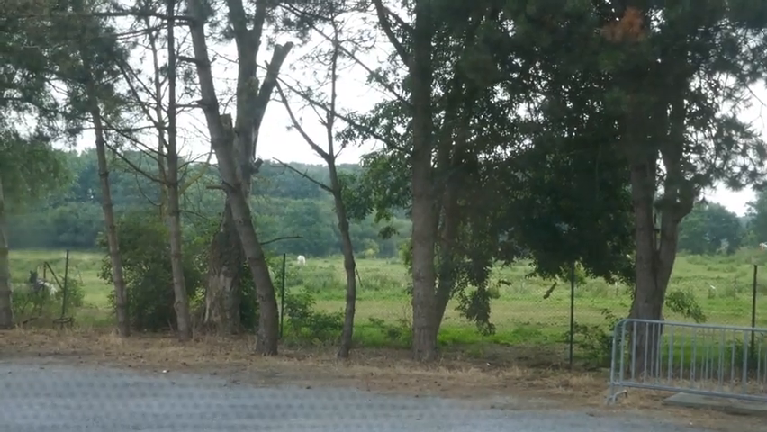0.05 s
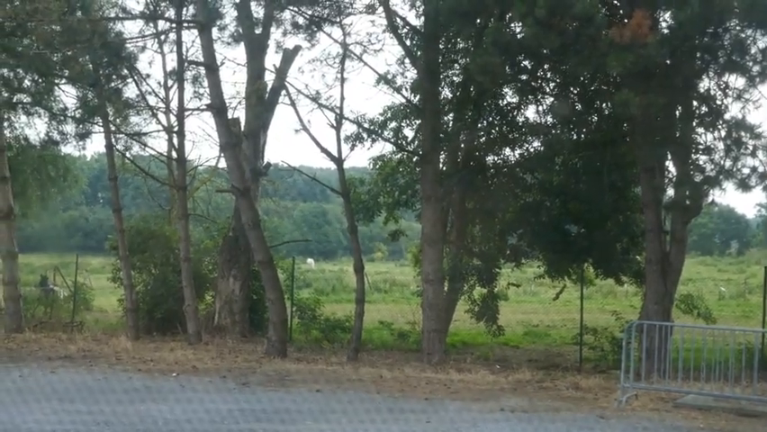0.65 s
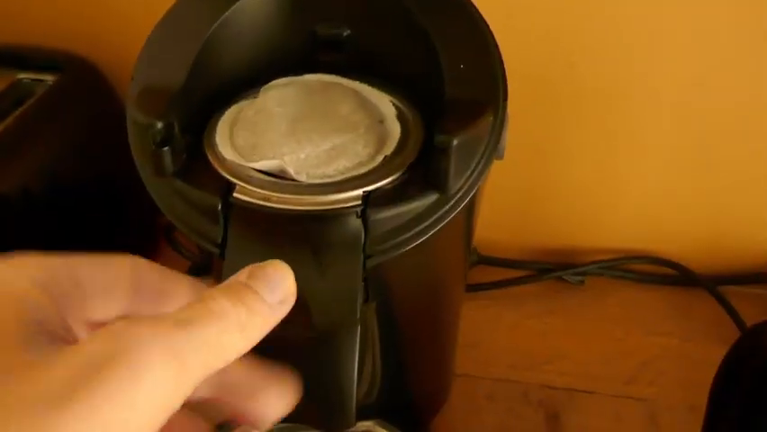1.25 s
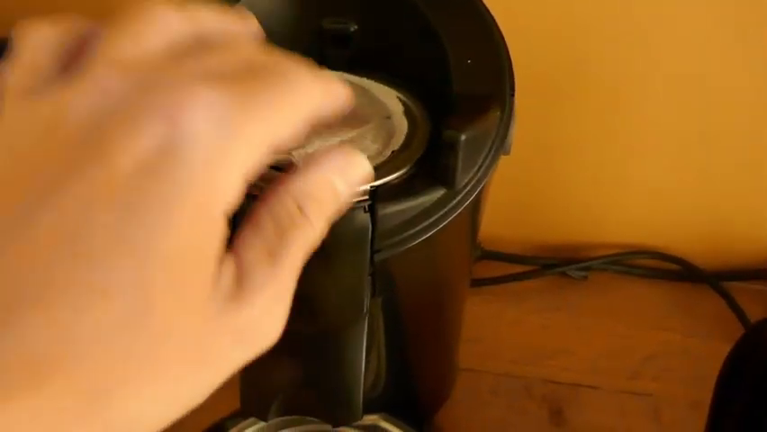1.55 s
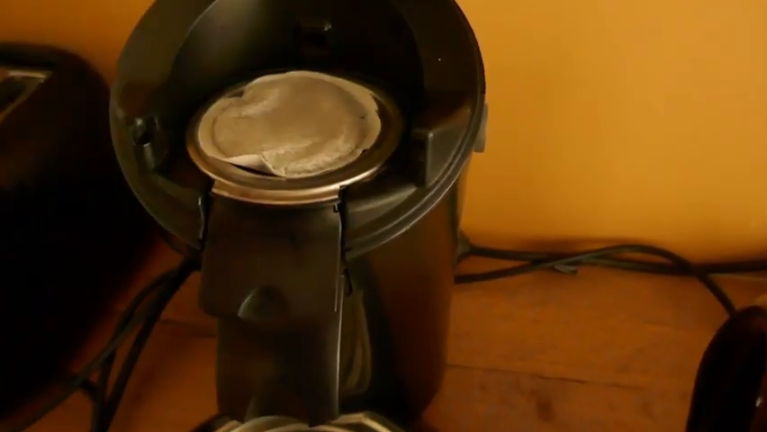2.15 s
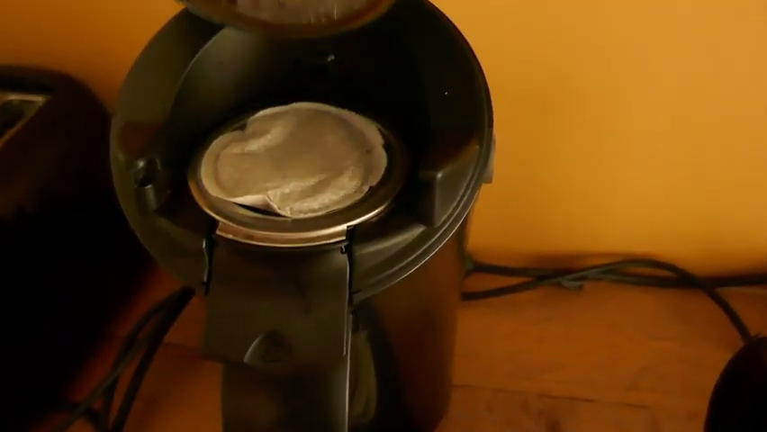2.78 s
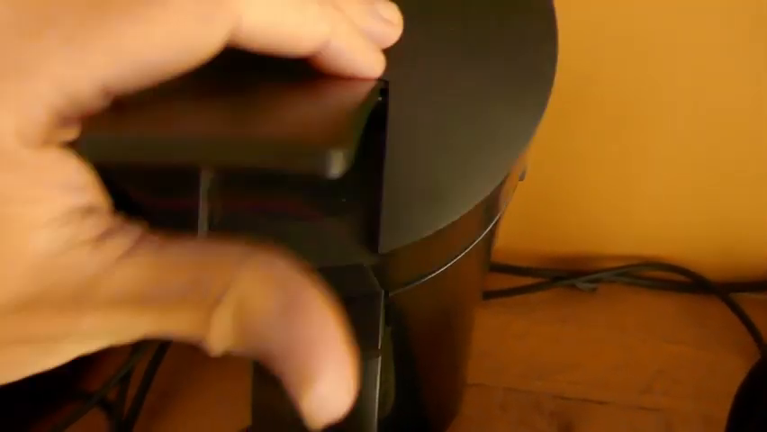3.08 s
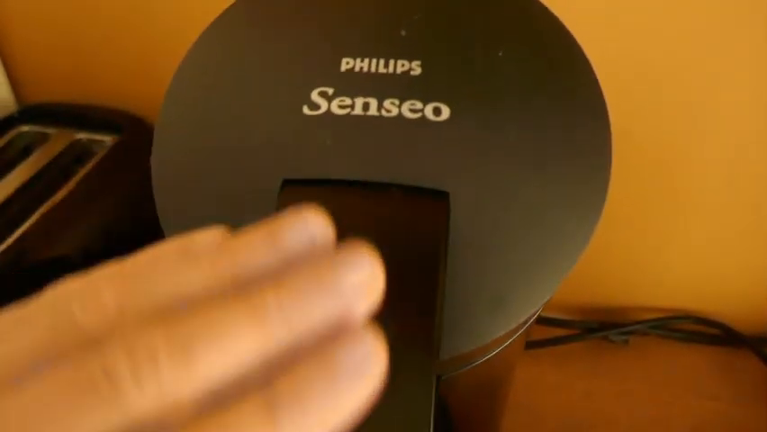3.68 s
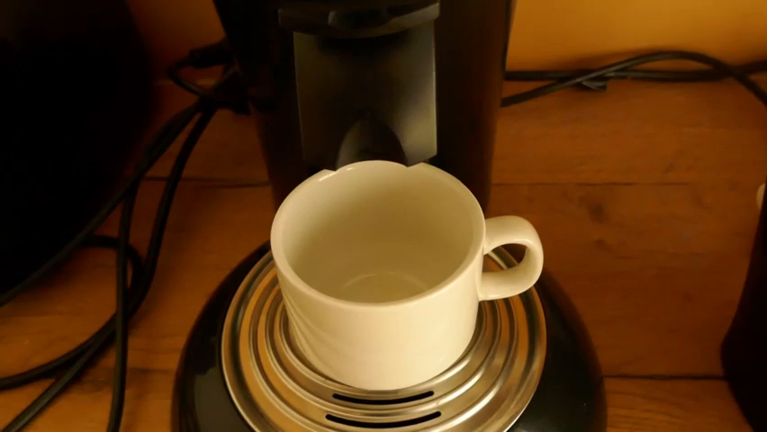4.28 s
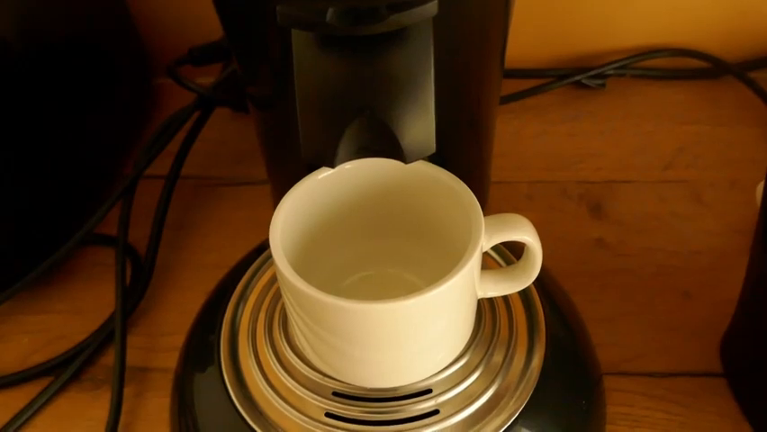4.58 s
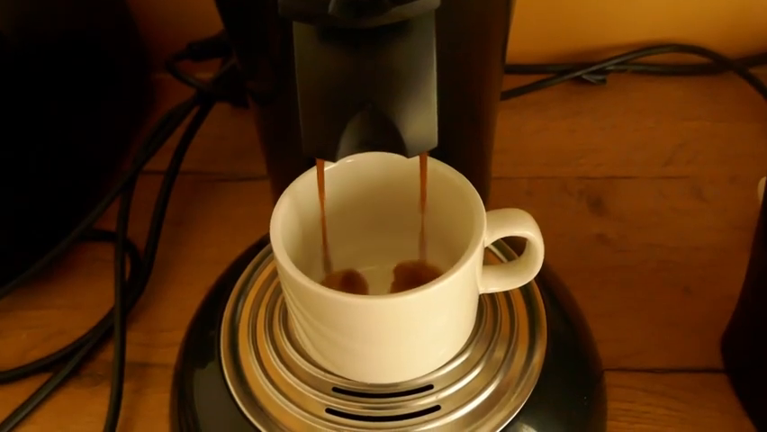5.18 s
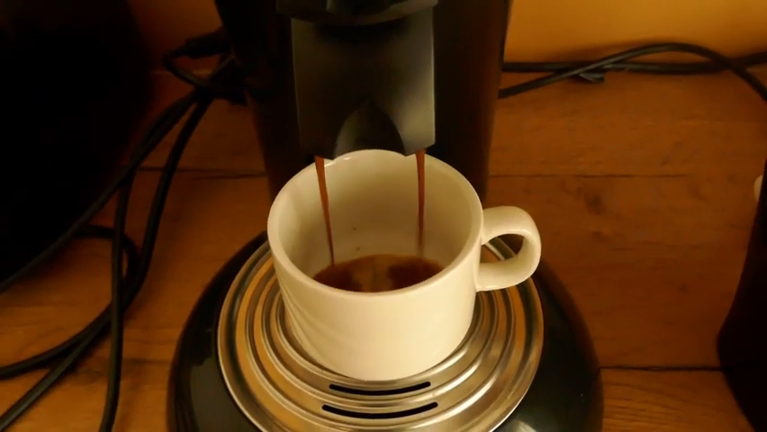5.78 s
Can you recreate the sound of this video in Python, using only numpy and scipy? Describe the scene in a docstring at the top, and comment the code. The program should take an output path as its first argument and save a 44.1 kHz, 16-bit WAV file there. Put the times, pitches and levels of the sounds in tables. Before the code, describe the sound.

Plastic parts knock, a coffee machine's lid thumps and snaps shut, then its pump buzzes and coffee trickles into a cup.

```python
"""Faint open air gives way to a small kitchen, where a hand seats the pod holder in a plastic coffee
machine: knocks ring the housing and the room, and the holder squeaks twice. The lid rubs and thumps shut,
then the lever snaps down, so loud that a limiter ducks. The vibration pump starts, buzzing, rattling and
hissing at the mains rate, its tone shifting as the pod soaks. Air crackles in the line and spits at the
spout, and at last thin streams of coffee trap small bubbles in the cup."""
import sys
import numpy as np
from scipy import signal
from scipy.fft import rfft, irfft, next_fast_len
from scipy.io import wavfile
from scipy.ndimage import uniform_filter1d, minimum_filter1d, map_coordinates

SR = 44100
rng = np.random.default_rng(int(sys.argv[2]) if len(sys.argv) > 2 else 0)


def to_wav(s):
    """Save 16-bit WAV."""
    ch = np.atleast_2d(s).T  # columns
    pcm = np.round(np.clip(ch, -1, 1) * 32767)  # PCM
    wavfile.write(sys.argv[1], SR, pcm.astype(np.int16))


N = 266364

RING_DB, RING_Q, RING_MASKING = 10, 3, 0.36  # the struck part's note; masking: dB lost per dB of hardness
REBOUND_S, REBOUND_DB, REBOUND_HARDNESS_DB = .018, -15.5, -5  # a loose part settles, weaker and softer
REBOUND_CAP_DB = -19.5  # stronger blows than this bounce no further
# The hits of holder, lid and lever. Each row: start in seconds, relative level in dB, ring pitch in Hz,
# seconds for the chatter to fall 60 dB, hardness in dB, thud in dB.
PLASTIC_HITS = [(0.8217, -17, 856, 0.023, 7, -25), (0.848, -27.5, 673, 0.081, -23, -6),
                (0.908, -27, 1030, .044, -0.5, 8), (1.038, -38, 787, 0.038, -15, 4),
                (1.048, -35, 815, 0.046, -19, 13), (1.056, -20.5, 660, 0.051, -21, 1),
                (1.084, -19.5, 590, .037, 2, -2), (1.194, -40, 688, 0.028, -27, 12),
                (1.22, -37, 1830, 0.051, 8, 4), (1.3024, -18, 646, 0.024, -22, -15),
                (1.371, -13.5, 600, 0.029, 7, 1.5), (1.605, -41, 514, 0.13, 16, 19),
                (1.733, -58, 304, 0.018, 23, 4), (1.846, -41, 508, 0.12, 12.5, 17),
                (2.411, -39, 470, 0.095, 2, 0), (2.427, -32, 442, 0.16, -18, 1.5),
                (2.477, -33.5, 474, .088, 2.5, 4), (2.503, -28.5, 444, .033, -6.5, -2),
                (2.611, -33, 750, 0.068, 8, 9), (2.671, -22.5, 1980, 0.069, 4.5, -2),
                (2.776, -32.5, 517, 0.027, -17.5, -9), (2.82, -39.5, 441, 0.042, -25, 4),
                (2.859, -25.5, 1720, .021, -13, -5), (2.9111, -21.5, 553, 0.018, -5.5, -29),
                (3.0094, -12.5, 690, 0.019, 1.5, 0.5), (3.055, -12, 198, 0.08, 3, -0.5),
                (3.0779, -20, 1530, 0.053, 5, 7), (3.107, -27.5, 1010, 0.056, -2, -2),
                (3.13, -21, 950, 0.13, -8, -15), (3.4789, -48, 459, 0.037, -13, 9),
                (3.508, -43.5, 375, 0.054, -9, 4), (3.6438, -41, 360, 0.064, -21, 9),
                (3.6664, -33, 420, 0.045, -15.5, 15), (3.7005, -32, 413, 0.03, -12, 13),
                (3.7828, 0, 1600, 0.016, 16.5, 10.5), (3.922, -22.5, 285, 0.053, -3, 18)]


def plastic_knocks():
    """Parts knock and rebound; the room hears each hit from many sides, which evens out its colour."""
    out = np.zeros((2, N))
    for s, db, ring_hz, chatter_t60, hardness_db, thud_db in PLASTIC_HITS:
        band_dbs = db + blow_colour(ring_hz, hardness_db, thud_db)
        ring_db, width_hz = RING_DB - RING_MASKING * hardness_db, ring_hz / RING_Q
        direct = knock(chatter_t60, ring_hz, ring_db, width_hz, band_dbs, chatter_db=-16, housing_db=1.5)
        add(out, s, amp(-1) * spread(direct, side_db=-11))
        radiated = knock(chatter_t60, ring_hz, ring_db - 8, 0.76 * width_hz, band_dbs,
                         chatter_db=-29, housing_db=-2)
        add(out, s, amp(-12) * room(radiated[0], side_db=-7.5))
        softer = blow_colour(ring_hz, hardness_db + REBOUND_HARDNESS_DB, thud_db)
        settle_dbs = min(db, REBOUND_CAP_DB) + REBOUND_DB + softer
        rebound = knock(chatter_t60, ring_hz, ring_db, width_hz, settle_dbs, chatter_db=-14, housing_db=3)
        add(out, s + REBOUND_S, spread(rebound, side_db=-10))
    return out


# The EQ bands of a hit. Each row: low edge in Hz, high edge in Hz.
HIT_BANDS = [(100, 400), (400, 1200), (1200, 3000), (3000, 6000), (6000, 16000)]
# The tone of a hit, band by band. Each row: level in dB, share of the hardness, share of the thud.
HIT_EQ = [(-21, 0, 1), (-7, 0, 0), (-9, 0.34, 0), (-25.5, 0.8, 0.083), (-29.5, 1.2, 0)]


def blow_colour(ring_hz, hardness_db, thud_db, ring_lift_db=5.5):
    """Band levels in dB: hard blows add treble, heavy ones bass, and the part's note lifts its band."""
    return np.array([db + hard * hardness_db + heavy * thud_db + ring_lift_db * (lo <= ring_hz < hi)
                     for (lo, hi), (db, hard, heavy) in zip(HIT_BANDS, HIT_EQ)])


HIT_FILTERS = [signal.butter(4, band, "band", fs=SR, output="sos") for band in HIT_BANDS]
# The resonances of the plastic housing. Each row: pitch in Hz, width in Hz, relative level in dB.
HOUSING_MODES = [(321.7, 38, 12.5), (446, 12.4, 4.5), (599, 47, 1), (857, 180, -1), (1684, 170, 6),
                 (2148, 360, 8.5), (4550, 550, 9), (10100, 2200, 10.5)]


def knock(chatter_t60, ring_hz, ring_db, ring_width_hz, band_dbs, chatter_db, housing_db):
    """A blow and its chatter ring the part and the housing; each contact point favours other modes."""
    t = np.arange(SR // 6) / SR
    force = rng.standard_normal((2, len(t))) * amp(chatter_db - 60 * t / chatter_t60)
    force[0, 0] += 1  # the blow itself
    modes = [(hz, width, db + housing_db + rng.normal(0, 0.55)) for hz, width, db in HOUSING_MODES]
    housing = lambda f: 1 + sum(amp(db) * resonance(f, hz, width) for hz, width, db in modes)
    # the struck part drives the hollow behind it, so its note swells for a few cycles
    ring = filtered(force, lambda f: housing(f) + amp(ring_db) * resonance(f, ring_hz, ring_width_hz) ** 2)
    sound = 0
    for band, db in zip(HIT_FILTERS, band_dbs):
        part = signal.sosfilt(band, ring)
        energy = np.sum(part ** 2, axis=1, keepdims=True)
        sound = sound + amp(db) * part / np.sqrt(energy / (.01 * SR))  # level as if packed into 10 ms
    return sound


PUMP_START_S, FIRST_STROKE_S, STROKE_HZ = 4.179, .006, 49.93  # the first stroke lags the switch
PUMP_DB, LOAD_LOSS_DB = -33.5, 3  # base level of the layers; loss per unit of added back pressure
SOAK_START_S, SOAK_S, DRY_PRESSURE, WET_PRESSURE = 4.325, 0.63, 0.29, 0.91  # pressure on a 0-1 scale
CATCH_S, CATCH_DB, CATCH_WIDTH_S = 4.405, -2, .035  # the pump falters as it catches the water


def pump():
    """The piston strokes once a mains cycle against a pressure that climbs while the pod soaks."""
    t = np.arange(N) / SR
    pressure = np.interp(t, [SOAK_START_S, SOAK_START_S + SOAK_S], [DRY_PRESSURE, WET_PRESSURE])
    load = pressure - DRY_PRESSURE
    falter_db = CATCH_DB * np.exp(-((t - CATCH_S) / CATCH_WIDTH_S) ** 2)
    effort_db = PUMP_DB - LOAD_LOSS_DB * load + falter_db
    phase = 2 * np.pi * np.cumsum(STROKE_HZ + 0.036 * wobble(8)) / SR
    phase = phase - np.interp(PUMP_START_S + FIRST_STROKE_S, t, phase) + np.pi
    stroke = -np.cos(phase) * np.maximum(1 - 0.91 * pressure, 0)  # water cushions it as pressure builds
    buzz = amp(effort_db - 1) * piston_buzz(t, phase, pressure)
    rattle = amp(effort_db - 5.5 - 3 * load) * case_rattle(stroke)
    hiss = amp(effort_db - 8.5 + 0.5 * load) * water_hiss(stroke)
    ticks = amp(-48.5 - 10 * pressure) * valve_ticks(phase)
    switch_on = np.clip((t - PUMP_START_S) / 0.0018, 0, 1)
    return (buzz + rattle + hiss + ticks) * switch_on


# The pump's three voices: running free, wetting the pod, and pushing water through it.
# Each row: harmonic of the stroke rate, relative level in dB.
BUZZ_FREE = [(1, -49), (2, -8.5), (3, -8), (4, -11), (5, -7), (6, -14), (7, -10), (8, -11), (9, -10),
             (10, -2.5), (11, -3), (12, -3), (13, -33), (14, -25), (15, -21), (16, -8), (17, 10),
             (18, -6.5), (19, -6), (20, 1), (21, -4), (22, -17.5), (23, -27), (24, -16), (25, -24),
             (26, 0.5)]
BUZZ_WETTING = [(1, -31), (2, -7), (3, 0), (4, -1.5), (5, 3.5), (6, 1.5), (7, -0.5), (8, 3.5), (9, 3),
                (10, 1), (11, -4), (12, 0), (13, -11), (14, -6), (15, -2), (16, 0), (17, -6.5), (18, -6),
                (19, -6), (20, -19), (21, -16), (22, -25), (23, -39), (24, -15), (25, -24), (26, -17)]
BUZZ_LOADED = [(1, -35), (2, -10), (3, -7), (4, -4), (5, -2.5), (6, 2.5), (7, -8), (8, -2), (9, -15.5),
               (10, -8), (11, 4.5), (12, -3.5), (13, -25), (14, 0), (15, -1.5), (16, 0), (17, -5),
               (18, -1.5), (19, -17), (20, -4), (21, -25), (22, -17), (23, -31), (24, -17), (25, -6.5),
               (26, -20)]


def piston_buzz(t, phase, pressure):
    """The strokes sound a stack of harmonics; back pressure morphs it from one voice to the next."""
    buzz = np.zeros((2, N))
    for (k, free_db), (_, wetting_db), (_, loaded_db) in zip(BUZZ_FREE, BUZZ_WETTING, BUZZ_LOADED):
        db = np.interp(pressure, [0, .65, 1], [free_db, wetting_db, loaded_db]) + 1.7 * wobble(3.786)
        # bending waves in the case carry highs faster, so each stroke is a falling chirp; load shifts it
        lag = 23 * np.sqrt(k) + rng.normal() * (0.67 + 1.25 * pressure)
        stereo_phase = 0.22 * rng.normal() * np.array([[1], [-1]])
        buzz += amp(db) * np.sin(k * phase - lag + stereo_phase)
    return buzz / np.sqrt(np.mean(buzz[:, t > PUMP_START_S] ** 2))


# The boxy tone of the shaking case. Each row: frequency in Hz, relative level in dB.
RATTLE_EQ = [(60, -26), (130, -26), (250, -8), (450, -10.5), (620, 0), (860, 1), (1050, -13.5), (1400, -89),
             (3000, -71)]


def case_rattle(stroke):
    """Each stroke shakes the case into a pulse of midrange noise."""
    return unit(noise(RATTLE_EQ, side_db=-24) * amp(5.4 * stroke))


# The bright tone of the water hiss, also used for the lid's rasp.
# Each row: frequency in Hz, relative level in dB.
HISS_EQ = [(500, -27), (1100, 0.5), (1650, 7), (2100, 1.5), (2550, 7), (2950, -2), (3600, -2.5),
           (4050, -15.5), (4400, -2), (4800, -7), (5900, -19), (8400, -19), (10300, -11.5), (16000, -18.5)]


def water_hiss(stroke):
    """Each stroke pushes a fluttering hiss of water."""
    return unit(noise(HISS_EQ, side_db=-12.5) * amp(3.7 * stroke + 1.7 * wobble(45) + 0.72 * wobble(640)))


# The crisp top end of ticks, crackles and spits. Each row: frequency in Hz, relative level in dB.
CRACKLE_EQ = [(1500, -18), (3200, -7), (4700, 6.5), (7000, -7), (11000, 0.5), (16000, -4.5)]


def valve_ticks(phase, t60=0.028):
    """The valve ticks once a stroke, never equally hard."""
    since_tick = (phase + np.pi) % (2 * np.pi) / (2 * np.pi * STROKE_HZ)
    return unit(noise(CRACKLE_EQ, side_db=3.5) * amp(-60 * since_tick / t60 + 2.7 * wobble(50)))


def line_sputter(count, t60=0.02):
    """Air in the water line crackles at uneven moments, growing fainter as the pump runs."""
    t, bursts = np.arange(SR // 20) / SR, np.zeros(N)
    run_s = N / SR - PUMP_START_S - .01
    for when, softness in rng.random((count, 2)):
        add(bursts, PUMP_START_S + when * run_s, amp(-40 - 11 * softness - 6.9 * when - 60 * t / t60))
    return bursts * noise(CRACKLE_EQ, side_db=2)


def cup_bubbles(count, start_s, span_s):
    """The streams of coffee trap small bubbles, each ringing as a short rising blip."""
    t, bubbles = np.arange(SR // 20) / SR, np.zeros(N)
    for when, pitch, softness in rng.random((count, 3)):
        hz = 1400 * 3.5 ** pitch
        blip = np.sin(2 * np.pi * hz * t * (1 + 4 * t)) * np.exp(-t * hz / 7)
        add(bubbles, start_s + span_s * when, amp(-36 - 44 * softness) * blip)
    return bubbles


# The spits at the spout. Each row: start in seconds, relative level in dB.
SPIT_CUES = [(4.561, -29.5), (5.511, -25), (5.6824, -28), (5.731, -28), (5.822, -34)]


def spout_spits(t60=0.031):
    """Air escapes at the spout in short, bright bursts."""
    t, bursts = np.arange(SR // 20) / SR, np.zeros(N)
    for s, db in SPIT_CUES:
        add(bursts, s, amp(db - 11 - 60 * t / t60))
    return bursts * noise(CRACKLE_EQ, side_db=-7)


def lid_thump(s, hz, t60, db):
    """The lid lands on its rubber seal and rocks the whole machine."""
    t, out = np.arange(SR // 3) / SR, np.zeros((2, N))
    attack = (1 - np.exp(-t / 0.0015)) ** 2
    thump = amp(db - 60 * t / t60) * np.sin(2 * np.pi * hz * t) * attack
    add(out, s, thump + amp(-17.5) * room(thump, side_db=-11)[:, :len(t)])
    return out


# The tone of sliding on plastic. Each row: frequency in Hz, relative level in dB.
RUB_EQ = [(88, -61), (150, -45), (321, -5), (998, -11), (1100, -8), (1630, -9), (2980, -24), (3620, -24),
          (10200, -42.5), (15100, -41), (16000, -85)]
# The slides of the hand and the lid's seal. Each row: time of reaching full force in seconds,
# level in dB, hold in seconds, release in dB per second.
RUB_CUES = [(2.436, -54.5, 0.0076, 200), (2.47, -57, 0.0042, 250), (2.563, -57, 0.0046, 298),
            (2.675, -41, 0.0044, 300), (3.092, -28.5, 0.054, 328), (3.771, -38.5, 0.007, 894)]


def rubbing(swell_db_per_s=197, slips_per_s=110, slip_t60=0.017, rasp_db=-7.5):
    """Each slide swells, holds and lets go; the contact sticks and slips in fine grains."""
    t = np.arange(N) / SR
    force = sum(amp(db - swell_db_per_s * np.maximum(s - t, 0) - release * np.maximum(t - s - hold, 0))
                for s, db, hold, release in RUB_CUES)
    slips = (rng.random(N) < slips_per_s / SR) * amp(3.7 * rng.standard_normal(N))
    grains = signal.fftconvolve(slips, amp(-60 * t[:SR // 20] / slip_t60))[:N]
    rasp = amp(rasp_db) * unit(grains * noise(HISS_EQ, side_db=-5))
    friction = unit(noise(RUB_EQ, side_db=-8) * amp(1.17 * wobble(220)))
    slide = force * (friction + rasp)
    return slide + amp(-6) * room(slide[0], side_db=-10.5)[:, :N]


# The holder's squeaks. Each row: time of the peak in seconds, level in dB.
SQUEAK_CUES = [(1.72, -57), (1.935, -54)]


def holder_squeaks(hz=910, rise_s=0.021, t60=0.23):
    """The holder squeaks faintly, twice, as the fingers let go."""
    t = np.arange(N) / SR
    level = sum(amp(db - 60 * np.maximum(t - s, 0) / t60) * np.exp(np.minimum(t - s, 0) / rise_s)
                for s, db in SQUEAK_CUES)
    return level * np.sin(2 * np.pi * np.cumsum(hz + 4 * wobble(60)) / SR)


# The length of the kitchen's reverb. Each row: frequency in Hz, seconds to fall 60 dB.
REVERB_DECAY = [(150, 1.26), (400, 0.78), (1000, 0.94), (2500, 0.8), (6000, 0.74), (14000, 0.62)]
# The tone of that reverb. Each row: frequency in Hz, gain in dB.
REVERB_EQ = [(70, -17), (110, -22), (150, 8.5), (220, -4.5), (330, 0.5), (600, 0), (1000, -6), (1400, -5),
             (2200, -6.5), (3500, -7), (7500, -4.5), (11000, -2.5)]


def room(x, side_db):
    """The worktop and near wall answer at once; the kitchen follows, each band dying at its own speed."""
    hz, t, spectra = signal.stft(rng.standard_normal((2, SR)), SR, nperseg=256)
    late = signal.istft(spectra * amp(-60 * t / along(REVERB_DECAY, hz)[:, None]), SR, nperseg=256)[1]
    t = np.arange(late.shape[1]) / SR
    late = late * (1 - np.exp(-t / 0.0036))
    early = rng.standard_normal(late.shape) * amp(-60 * t / 0.059) * (t > .004)
    tail = late / np.linalg.norm(late[0]) + amp(4) * early / np.linalg.norm(early[0])
    tail = filtered(tail, lambda f: amp(along(REVERB_EQ, f)))
    return signal.fftconvolve(x[None], spread(tail, side_db), axes=1)


# The two ambience beds, open air and kitchen. Each row: frequency in Hz, relative level in dB.
OPEN_AIR_EQ = [(12, -67), (20, -34), (113, -18.5), (158, -5), (187, -13), (270, -17.5), (499, -16.5),
               (825, -20.5), (923, -18.5), (1060, -21), (1150, -23), (1290, -23), (7730, -47.5),
               (9670, -34), (16000, -40.5)]
KITCHEN_EQ = [(15, -55.5), (25, -23), (161, -1), (206, -7), (249, -9), (335, -1), (373, -8.5), (531, -5.5),
              (624, -12), (818, -7), (911, -13), (1400, -11.5), (6560, -31), (12900, -24), (16000, -33)]


def ambience(indoors_s=.75, fade_s=0.049):
    """Faint open air crossfades into the room tone of the still kitchen."""
    indoors = np.clip((np.arange(N) / SR - indoors_s) / fade_s, 0, 1)
    air = amp(-62.5) * noise(OPEN_AIR_EQ, side_db=0)
    kitchen = amp(-59) * noise(KITCHEN_EQ, side_db=0.5)
    return (1 - indoors) * air + indoors * kitchen


def amp(db):
    """Gain from dB."""
    return 10 ** (np.asarray(db) / 20)


def unit(x):
    """x scaled to rms 1."""
    return x / np.sqrt(np.mean(x ** 2) + 1e-20)


def along(points, hz):
    """A curve through (Hz, value) points on a log axis."""
    f, v = np.transpose(points)
    return np.interp(np.log(hz + 1), np.log(f + 1), v)


def wobble(rate):
    """A random drift, rate knots a second."""
    knots = rng.standard_normal(int(N * rate / SR) + 4)
    return map_coordinates(knots, [np.arange(N) * rate / SR], order=1)


def filtered(x, response):
    """x through a complex response of frequency."""
    n = x.shape[-1]
    padded = next_fast_len(n + 8192)
    return irfft(rfft(x, padded) * response(np.fft.rfftfreq(padded, 1 / SR)), padded)[..., :n]


def resonance(f, hz, width):
    """Response of one damped mode."""
    return 1j * f * width / (hz * hz - f * f + 1j * f * width)


def spread(pair, side_db):
    """Left and right from a mid and a side signal."""
    return pair[0] + amp(side_db) * np.array([pair[1], -pair[1]])


def noise(spectrum, side_db):
    """Coloured stereo noise of rms 1."""
    coloured = filtered(rng.standard_normal((2, N)), lambda f: amp(along(spectrum, f)))
    return unit(spread(coloured, side_db))


def add(track, s, sound):
    """Mix a sound into a track from s seconds."""
    start = min(round(s * SR), N - 1)
    track[..., start:start + sound.shape[-1]] += sound[..., :N - start]


# The machine's stereo placement, lows leaning left. Each row: frequency in Hz, left minus right in dB.
MACHINE_PAN = [(100, 3.5), (400, 2.5), (700, 1.5), (1400, -1), (12000, -0.5)]


def scene():
    """The machine is closed, then brews, over the ambience."""
    closing = plastic_knocks() + rubbing() + holder_squeaks()
    closing += lid_thump(s=3.054, hz=184, t60=0.038, db=-14)
    brewing = pump() + line_sputter(count=70)
    brewing += cup_bubbles(count=70, start_s=4.95, span_s=1.05) + spout_spits()
    machine = filtered(closing + brewing, lambda f: amp(along(MACHINE_PAN, f) * np.array([[.5], [-.5]])))
    return machine + ambience()


def limiter(x, ceiling_db, recovery_db_per_s):
    """The gain drops at once on a peak and creeps back."""
    over_db = np.maximum(20 * np.log10(np.abs(x).max(axis=0) + 1e-9) - ceiling_db, 0)
    ramp = recovery_db_per_s * np.arange(N) / SR
    cut_db = np.maximum.accumulate(over_db + ramp) - ramp
    return x * amp(uniform_filter1d(minimum_filter1d(-cut_db, size=33), size=33))


def record(dry):
    """Peaks are limited, then everything above 16.2 kHz is cut."""
    return filtered(limiter(dry, ceiling_db=-1.5, recovery_db_per_s=40), lambda f: f < 16200)


dry = scene()
out = record(dry)
to_wav(out)
```